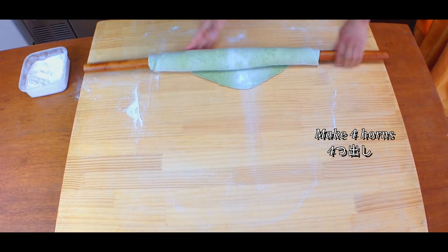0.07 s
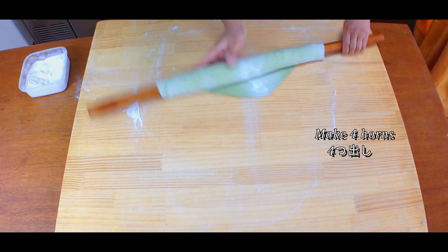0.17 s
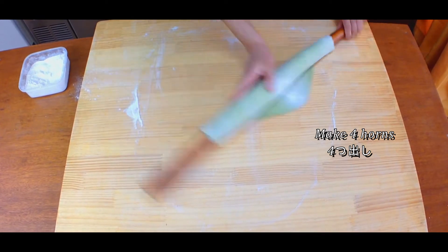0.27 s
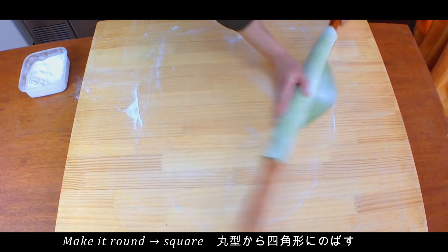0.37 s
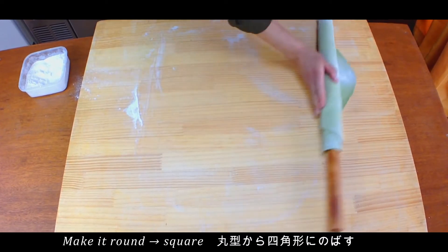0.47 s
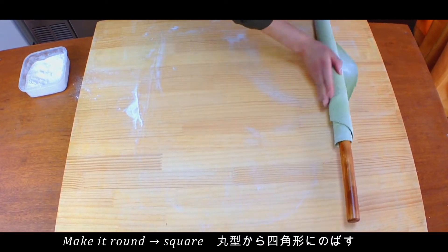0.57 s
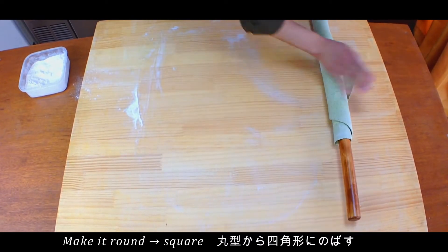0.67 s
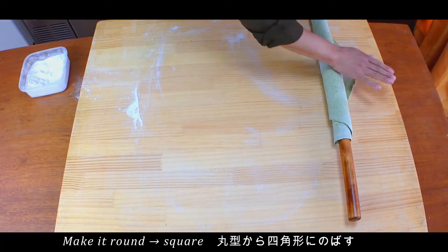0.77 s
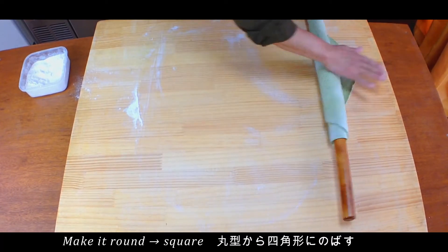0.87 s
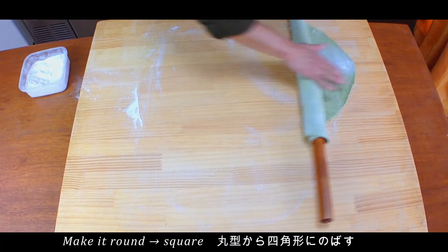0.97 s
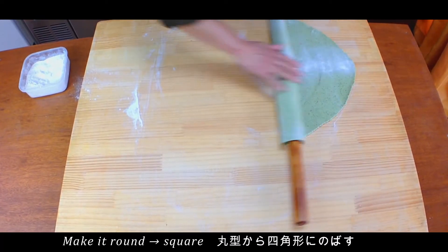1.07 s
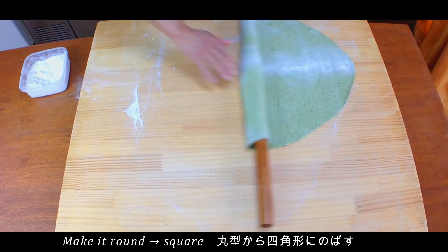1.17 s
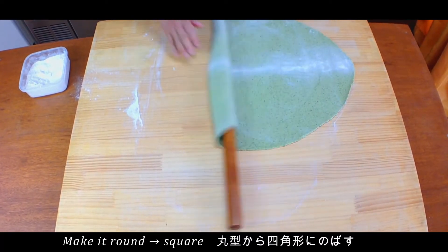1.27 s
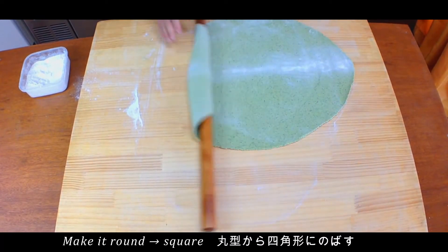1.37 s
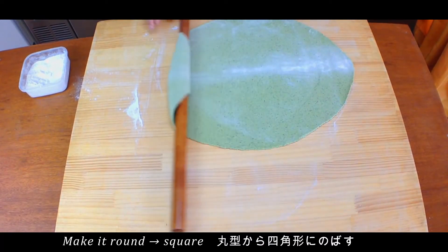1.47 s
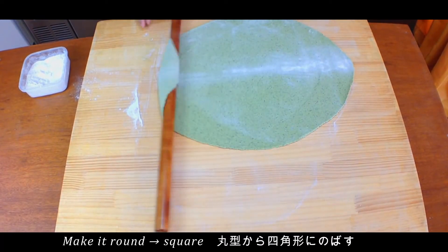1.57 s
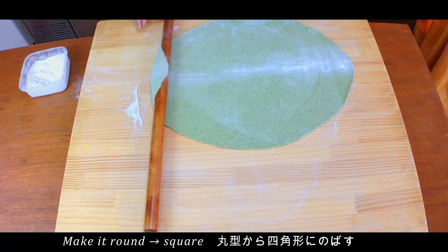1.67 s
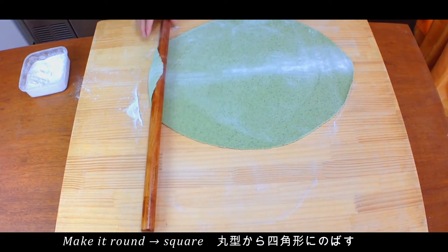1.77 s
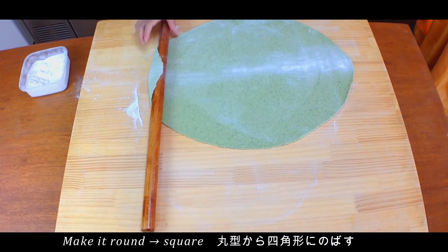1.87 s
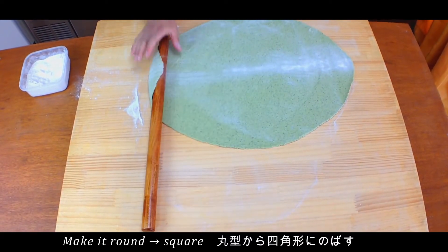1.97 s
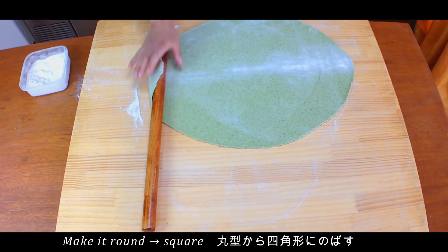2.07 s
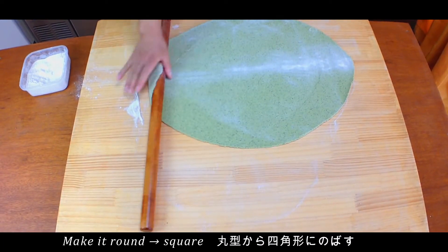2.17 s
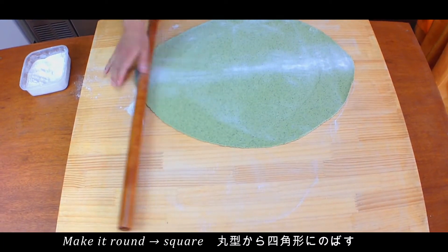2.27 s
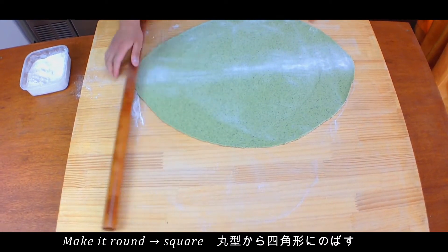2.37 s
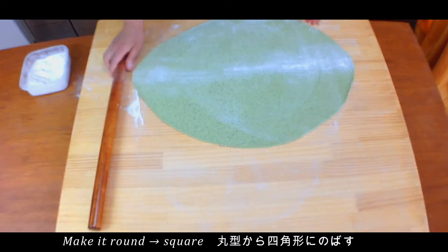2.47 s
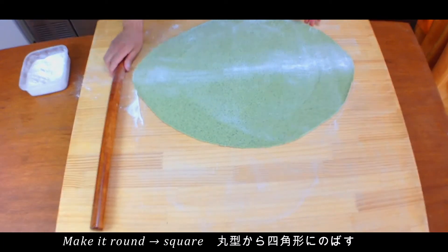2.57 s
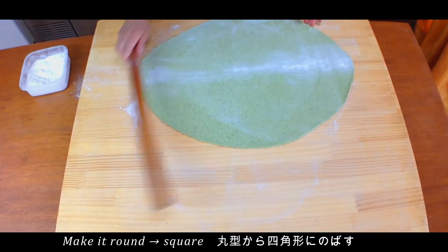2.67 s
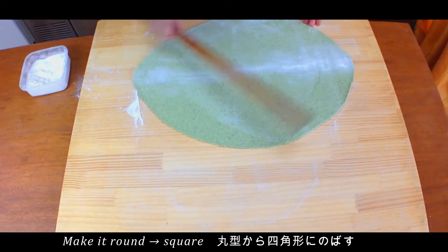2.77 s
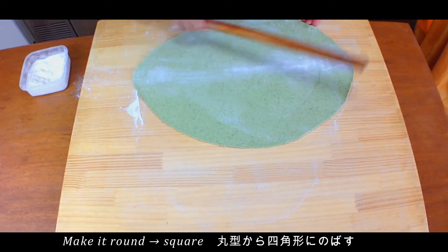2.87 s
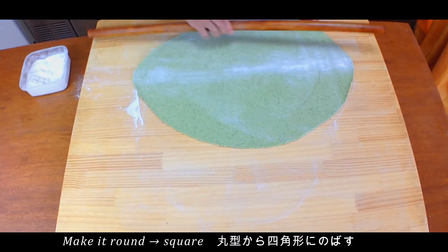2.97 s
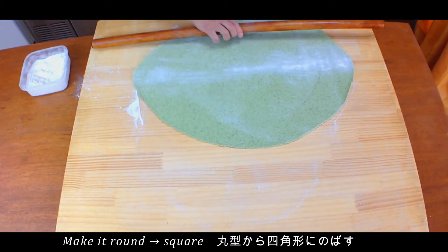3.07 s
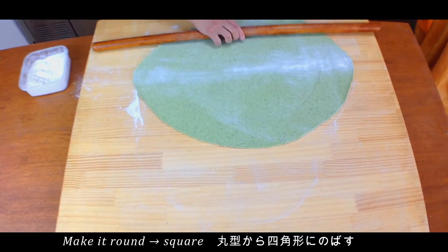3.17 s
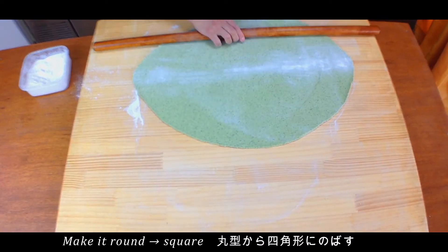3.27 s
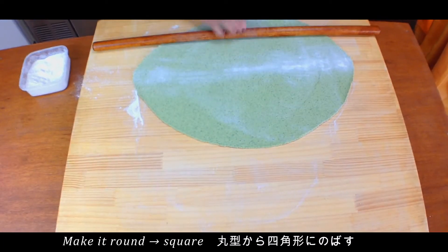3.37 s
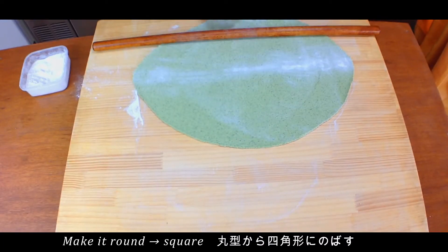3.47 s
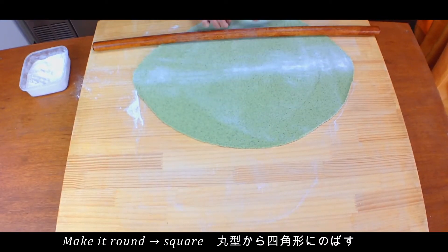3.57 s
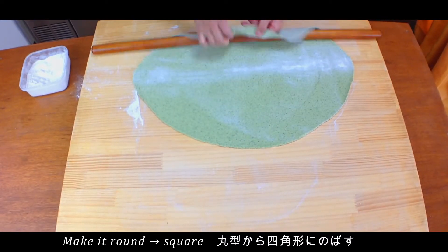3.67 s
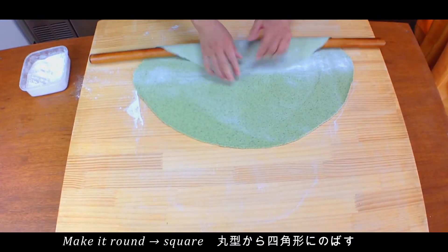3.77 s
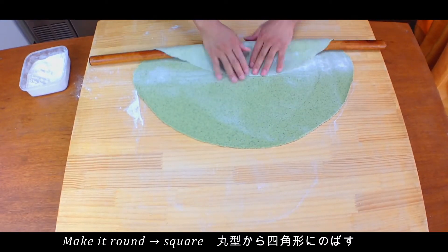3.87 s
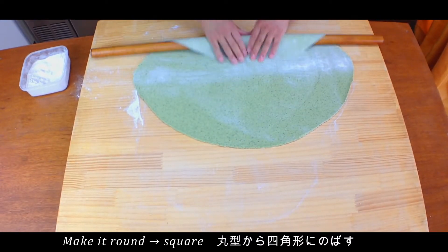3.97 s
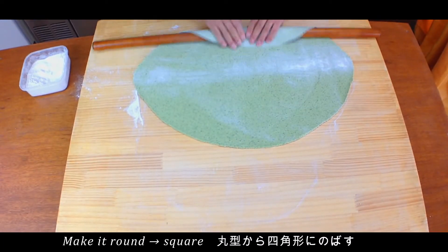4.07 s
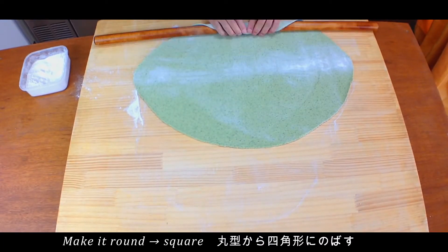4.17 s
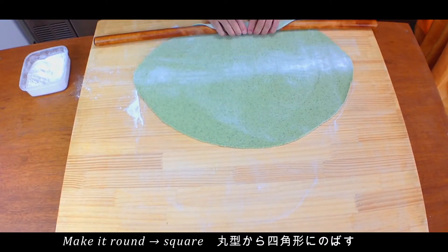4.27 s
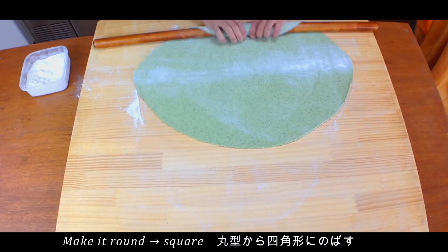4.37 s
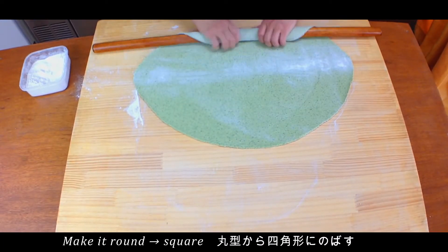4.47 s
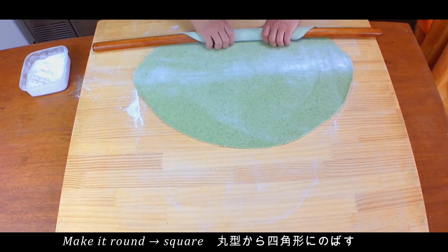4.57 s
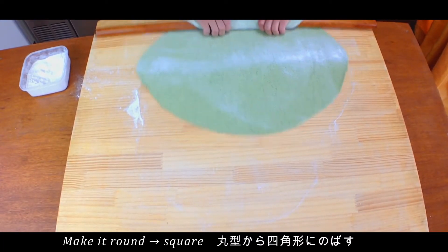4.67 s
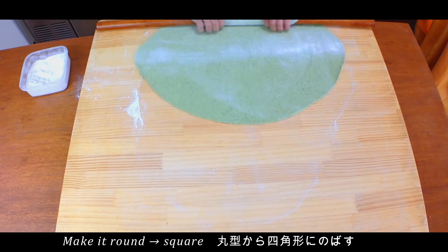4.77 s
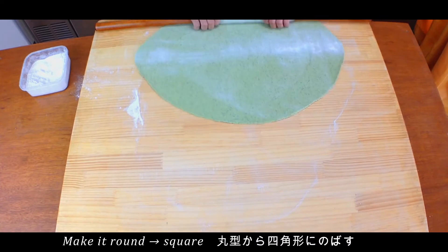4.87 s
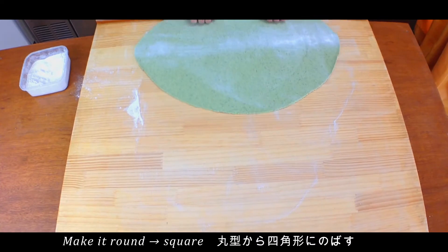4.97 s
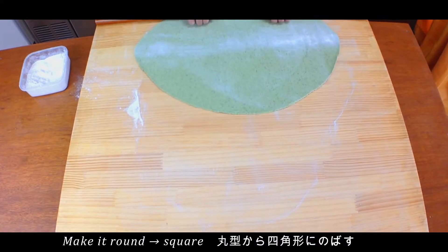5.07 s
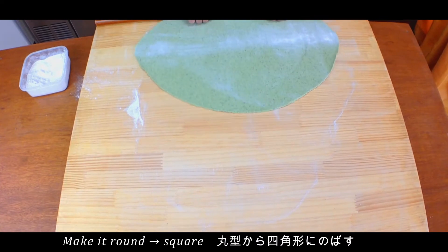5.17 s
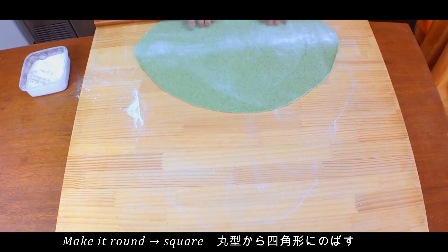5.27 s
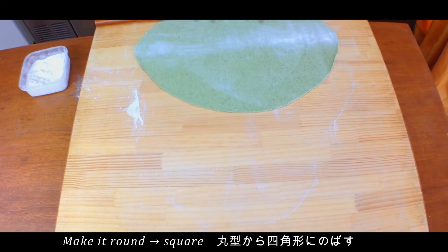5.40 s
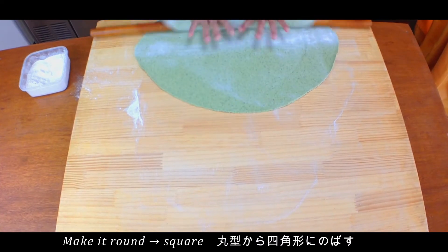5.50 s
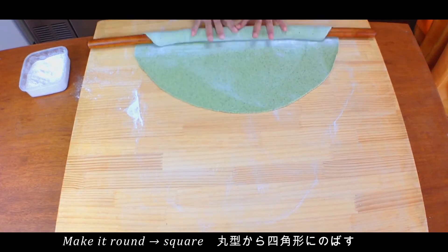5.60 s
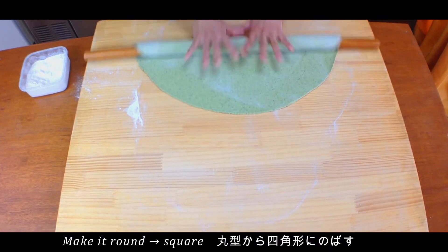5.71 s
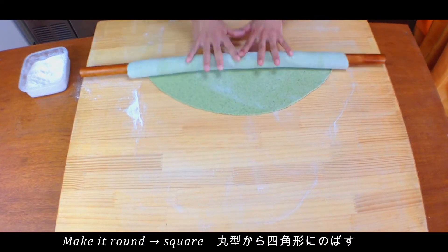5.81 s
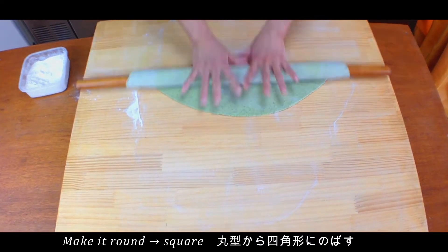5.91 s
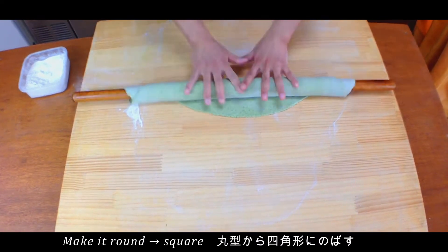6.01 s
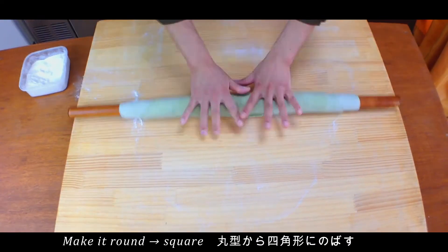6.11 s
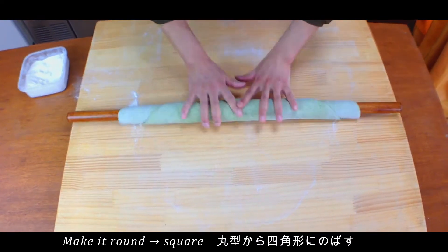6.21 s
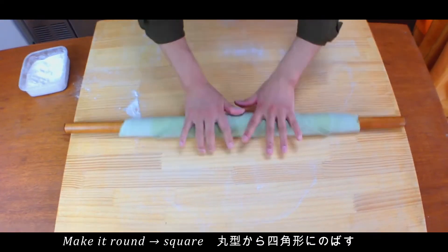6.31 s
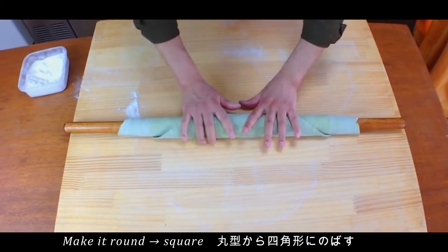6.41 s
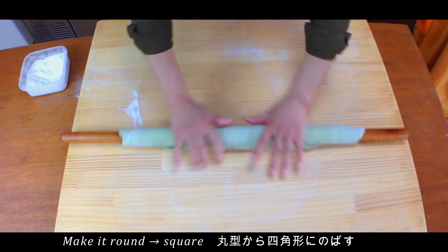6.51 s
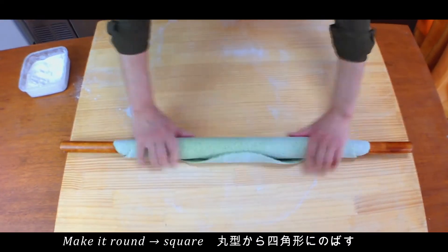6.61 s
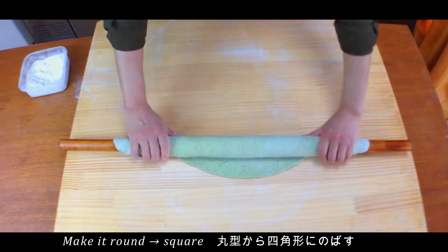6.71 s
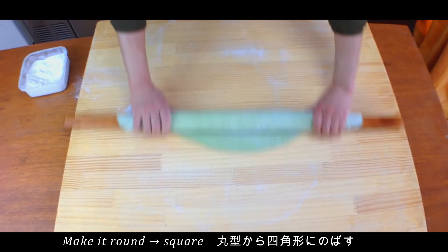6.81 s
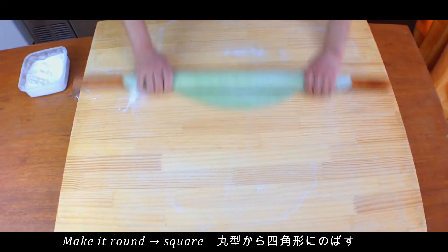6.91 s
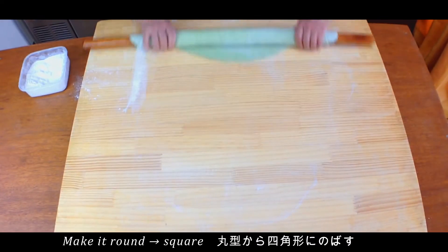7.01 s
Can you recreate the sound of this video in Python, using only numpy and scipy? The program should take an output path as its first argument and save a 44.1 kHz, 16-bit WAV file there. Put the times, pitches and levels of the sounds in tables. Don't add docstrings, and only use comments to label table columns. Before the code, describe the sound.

A small kitchen with short room echo, faint steady hiss and low table rumble, heard close. From 0.2 to 0.7 seconds a floured dough roll drags and turns over a wooden board with a dry hiss and soft rubbing pitch. Until 2.5 it is quiet: light brushing, gentle rumbling, a faint flick at 2.3. Around 2.53 to 2.58 the wooden pin lands in a loud, clattering double knock with hollow board ring. A second, sharper double knock comes near 3.25, followed by a low thump at 3.36. A duller padded knock falls at 3.94. Dough rubs softly from 4 to 4.3, then slides and presses from 4.6 to 5.3. From 5.5 to 6.5 come quick pushes about every 0.18 seconds, each a bright floury finger brush with a soft low thud and stand rumble. Small thuds lead to a strong sweeping hiss from 6.9 to the end, about 7.

```python
import sys
import numpy as np
from scipy import signal
from scipy.fft import rfft, irfft, next_fast_len
from scipy.io import wavfile
from scipy.ndimage import uniform_filter1d, map_coordinates

SR = 44100
rng = np.random.default_rng(int(sys.argv[2]) if len(sys.argv) > 2 else 0)


def to_wav(s):
    ch = np.atleast_2d(s).T
    pcm = np.round(np.clip(ch, -1, 1) * 32767)
    wavfile.write(sys.argv[1], SR, pcm.astype(np.int16))


def volts_from_decibels(level):
    exponent = np.asarray(level, float) / 20
    return 10 ** exponent


N = 310905

# start in seconds, clack level in dB, clack pitch in Hz,
# time for the clack to fall 60 dB in seconds, ring level in dB.
KNOCKS_LEFT = [(2.51, -47.5, 1500, 0.053, -69), (2.5175, -38.5, 1530, 0.036, -65),
               (2.5228, -25, 1580, 0.027, -63), (2.5274, -6, 1490, 0.008, -25),
               (2.5312, -11, 1163, 0.047, -49), (2.5430, -11.5, 1250, 0.012, -34.5),
               (2.5490, -14, 1545, 0.024, -30), (2.5561, -3, 1170, 0.026, -16.5),
               (2.5565, -9.5, 2435, 0.0095, -60.5), (2.5845, -10, 900, 0.012, -28.5),
               (2.668, -29.5, 972, 0.11, -61)]
KNOCKS_FAR = [
    (3.2390, -28, 1290, 0.016, -72),
    (3.2480, -21, 1250, 0.032, -36),
    (3.2545, -12.5, 900, 0.011, -18),
    (3.2612, -19, 978, 0.083, -36),
    (3.2652, -7, 1170, 0.008, -11),
    (3.2872, -25, 1816, 0.036, -7),
]
KNOCKS_WRAPPED = [
    (3.7620, -42.5, 1740, 0.05, -56),
    (3.9230, -21.5, 1380, 0.0076, -26),
    (3.9398, -9, 676, 0.012, -15),
    (3.9550, -25, 560, 0.077, -19),
    (5.0050, -42, 564, 0.036, -26),
]
# pitch in Hz, level in dB, time to
# fall 60 dB in seconds.
LEFT_EDGE = [(132.3, -9.5, 0.22), (205, -1.5, 0.13), (175, -8.5, .22), (248, -2, .066), (309.3, -3.5, 0.2),
             (353, -3, 0.073), (445, -11, 0.35), (544, -7.5, 0.17), (586, -1.5, 0.24),
             (824, -13, 0.17), (870, -9.5, .08), (972, -7, 0.22), (1200, -8, 0.045), (980, -13, 0.16),
            (1237, -4.5, .05), (1324, -15.5, .08), (1342, -7, .06), (1360, -13.5, 0.13), (1480, -7.5, .07),
            (1597, -7, 0.1), (1820, -2.5, 0.085), (2500, -16, .1), (2860, -31, .08)]
FAR_EDGE = [(120, -20.5, 0.143), (281.5, -3.5, 0.047), (309.5, -3.5, 0.093), (546, -8.5, 0.12),
            (613, -10, 0.091), (874, -7.5, .14), (962, -14.5, 0.068), (1220, -23, 0.18), (1430, -32, 0.073),
            (1500, 1.5, 0.017), (1860, -31, .2), (2230, -41, .15), (2466, -32, .09), (2570, -46, .2)]
WRAPPED = [(254, -20, 0.09), (438, -33, 0.095), (560, -8, 0.071), (612, -12, 0.066), (666, -15, 0.062),
           (860, -37, 0.091), (910, 2, 0.011), (1130, -14, .07), (1232, -17.5, 0.16), (1370, -28, 0.079)]
# frequency in Hz, level in dB per Hz.
CLATTER = [(150, -27.5), (400, 4), (1200, 4), (2500, -6), (3500, -18.5), (5500, -33), (9000, -45),
           (15000, -50)]
TICK = [(1500, -3), (3500, 8.5), (6000, 11), (9000, -10), (15000, -19)]
CLATTER_S = 0.0028
SHARP_S, SHARP_POWER = 0.016, 0.77
WANDER = 0.35
# start in seconds, level in dB, pitch in Hz, silent after this many seconds.
BOOMS = [
    (2.5551, -13.5, 156.5, 0.057),
    (2.5561, -24, 120, 0.056),
    (3.264, -31.5, 124.6, 0.055),
]
DAMP_POWER = 2.7

# start in
# seconds, speed-up in seconds, slow-down in seconds, flour hiss in dB, weight on the dough in dB.
MOVES = [(.175, 0.013, 0.091, -48, -7), (.19, 0.34, 0.21, -36.5, -2.5), (.508, 0.006, 0.047, -41.5, 6.5),
         (.56, 0.018, 0.037, -54, 7.5), (1.04, 0.4, 0.45, -61, -1), (3.27, 0.15, 0.11, -52.5, 3.5),
         (3.42, 0.089, 0.095, -62, 9.5), (4.0, 0.15, 0.076, -54, 2.5), (4.14, 0.13, 0.069, -54, 1.5),
         (4.27, 0.029, 0.16, -60, -8), (4.47, 0.093, 0.067, -58.5, -0.5), (4.58, 0.072, 0.24, -55.5, 2),
         (4.733, 0.011, 0.085, -47, -5), (4.75, 0.093, 0.069, -41, 3.5), (4.84, 0.063, 0.15, -54, 3.5),
         (4.99, 0.069, 0.12, -43, -2), (5.23, 0.038, 0.076, -50.5, -11.5), (6.645, 0.12, 0.2, -46, -3.5),
         (6.83, 0.037, 0.05, -65.5, 17), (6.888, 0.013, .1, -42, -3.5), (6.9, 0.16, .3, -30.5, -4),
         (0, 0.0026, 0.19, -58.5, -2), (.66, 0.054, .14, -50.5, -1), (.8, 0.14, 0.13, -70.5, 5.5),
           (1.05, .02, 0.23, -61, -9), (1.78, 0.033, 0.26, -78.5, 9), (2.28, 0.023, 0.33, -64.5, -2),
           (2.45, 0.14, 0.11, -57.5, -5), (2.62, 0.064, 0.11, -63, -8.5), (2.95, 0.1, 0.043, -61, -3.5),
           (3.08, 0.036, 0.032, -63.5, -11), (3.17, 0.084, 0.088, -61.5, 3), (3.64, 0.067, 0.03, -73, 6),
           (3.754, 0.022, 0.11, -58, 2.5), (3.85, 0.094, 0.14, -59.5, 2.5), (5.14, .04, 0.34, -63.5, 4)]
# start in seconds, coasting time in seconds, flour hiss in dB, weight in dB.
PUSHES = [
    (5.51, 0.57, -62.5, 0.5),
    (5.66, .07, -70, 9),
    (5.72, 0.3, -58, -1.5),
    (5.924, 0.32, -57.5, -0.5),
    (6.109, 0.29, -57, -3),
    (6.288, 0.26, -57, -6),
    (6.469, 0.36, -59, -10),
]
PUSH_S, REST_DB = 0.0084, -76
START_POWER, STOP_POWER = 0.86, 1.51
# start, speed-up and slow-down in seconds, level in dB.
ROLLS = [(.25, 0.29, 0.38, -48.5), (1.2, 0.3, 0.23, -63), (3.3, 0.083, 0.28, -52),
         (3.755, 0.012, 0.041, -55), (3.97, 0.044, 0.22, -63), (4.74, 0.1, 0.15, -49.5),
         (5.06, 0.05, 0.096, -48.5), (5.2, 0.084, 0.047, -58), (5.655, 0.013, 0.18, -56.5),
         (6.11, 0.01, 0.42, -60), (6.29, 0.014, 0.075, -56), (6.45, 0.037, 0.29, -60.5),
         (6.8, 0.11, 0.04, -52)]
# frequency in Hz, level in dB per Hz.
FLOUR = [(1500, -11), (3000, 0), (4500, 0), (7000, 0.5), (9500, -4.5), (12000, -5.5), (15500, -9)]
SCRAPE = [(500, -38), (950, -6), (1400, -2), (1900, -0.5), (2600, -3.5), (3800, -11.5), (7000, -19),
          (15000, -35)]
SKID = [(350, -40), (600, -12.5), (800, -4), (1050, -6.5), (1400, -5.5), (2500, -31), (6000, -82)]
DRONE = [(200, -46), (400, -5), (600, -2.5), (950, -5), (1300, -8), (2500, -29), (6000, -78)]
MURMUR = [(60, -38), (110, 0), (300, -5.5), (450, -15), (1000, -50.5), (3000, -99)]
MIDDLING_DB = -55
DRONE_DB, DRONE_GROWS = -61.5, 0.72
MURMUR_DB, MURMUR_GROWS, MURMUR_S = -62, 0.15, 0.27
MURMUR_LUMPS_DB = 3
# start in seconds, length in seconds, level in dB, first pitch in Hz, last pitch in Hz.
RUBS = [(0, 0.15, -64, 599, 920), (.25, 0.19, -50, 950, 1037), (0.424, 0.16, -45, 1553, 1580),
        (0.533, .1, -43, 1720, 2050), (0.598, 0.088, -46, 1074, 1190), (3.496, 0.068, -56.5, 900, 944),
        (4.026, .16, -57, 612, 735), (4.122, 0.15, -57, 803, 1133), (4.15, 0.12, -58, 1500, 1900),
        (4.14, 0.15, -63, 2320, 2700), (3.76, 0.022, -53, 1810, 1800), (4.61, 0.067, -54, 1900, 1690),
        (4.652, 0.055, -60, 1400, 1390), (5.076, .07, -54.5, 1098, 1226), (5.655, 0.046, -56.5, 710, 680),
        (6.17, 0.041, -52.5, 1013, 900), (6.12, 0.017, -50, 630, 630), (5.665, .05, -59, 1190, 1220),
        (5.717, .12, -57.5, 1150, 1048), (6.669, 0.17, -51.5, 894, 1070), (6.78, 0.091, -58, 1500, 1596)]
RUB_WIDTH_HZ = 210

# start in seconds, peak in dB, middle band in dB,
# rise in seconds, gone after this many seconds.
FLICKS = [(2.2922, -55, -15, 0.0028, 0.078), (3.2176, -63, 24.5, 0.0083, 0.19),
          (3.7656, -45, -6, .008, 0.12), (4.1012, -38.5, -17, 0.0076, .1), (5.247, -44, -11, 0.005, 0.091),
          (5.729, -35, -8.5, 0.0029, 0.061), (5.930, -39.5, -14, .002, 0.1),
          (6.112, -36.5, -20, 0.0048, .1), (6.293, -35.5, -9, 0.0069, .11), (6.45, -46, -8, .006, 0.079),
          (6.488, -40.5, -6, .004, 0.073)]
LIFT_POWER = 1.8
# start in seconds, level in dB, board pitch in
# Hz, rise in seconds.
PRESSES = [(0.184, -30, 150, 0.015), (2.525, -35, 111, .002), (2.639, -31, 77, 0.0068),
           (3.359, -16.5, 105, 0.038), (3.442, -26.5, 110, 0.024), (3.771, -42.5, 110, 0.0083),
           (3.968, -30.5, 270, 0.0083), (4.017, -34, 150, 0.01), (4.563, -37.5, 450, 0.012),
           (4.576, -38.5, 200, 0.005), (4.582, -41, 313, .006), (4.628, -45, 285, 0.0071),
           (4.741, -43, 330, 0.0072), (4.802, -27.5, 304, 0.02), (4.874, -36.5, 219, 0.0037),
           (5, -27, 163.6, 0.0066), (5.006, -31.5, 329, 0.0042), (5.097, -37.5, 159, 0.0074),
           (5.525, -31.5, 174, 0.016), (5.595, -56, 111, 0.012), (5.655, -44, 267, 0.0075),
           (5.665, -32, 162, 0.015), (5.735, -34, 150, 0.0095), (5.769, -41.5, 150, 0.0084),
           (5.949, -39.5, 150, 0.0057), (6.135, -34, 150, 0.0097), (6.16, -21.5, 270, 0.015),
           (6.188, -31.5, 150, 0.003), (6.324, -32, 135, 0.0076), (6.376, -25, 210, 0.01),
           (6.406, -32, 312, 0.012), (6.565, -33.5, 227, 0.0032), (6.58, -37.5, 327, 0.0035),
           (6.604, -35.5, 193, 0.0068), (6.681, -41.5, 320, 0.0076), (6.72, -32, 173, 0.014),
           (6.762, -31.5, 120, 0.0035), (6.835, -29, 235.5, 0.0058), (6.852, -34.5, 478, 0.004),
           (6.881, -31.5, 131, 0.006)]
PRESS_T60, PRESS_HZ, PRESS_POWER = 0.16, 150, 0.53
# start in seconds, level in dB.
JOLTS = [(.218, -32), (1.701, -29.5), (2.556, -44), (3.36, -42), (4.028, -37), (4.584, -31), (4.875, -32),
         (5.001, -34), (5.529, -28), (5.669, -31), (5.77, -37), (5.951, -23.5), (6.134, -21), (6.325, -42),
         (6.408, -18), (6.581, -18), (6.761, -39), (6.835, -22.5), (6.885, -31)]
STAND_HZ, STAND_T60 = 59, 0.046

# middle in seconds, half length in seconds, rumble in dB.
LEANS = [(0.236, 0.065, -41), (0.465, 0.22, -45.5), (1.14, 0.16, -40), (1.41, 0.21, -43.5),
         (1.74, 0.085, -40.5), (1.995, 0.044, -47), (2.54, 0.18, -41.5), (2.662, 0.1, -38),
         (2.9, 0.17, -46.5), (3.355, 0.19, -36), (3.557, 0.075, -39.5), (3.948, 0.03, -32),
         (4.078, 0.17, -40.5), (4.226, 0.15, -44), (4.61, 0.099, -42.5), (5.027, 0.1, -40),
         (5.294, 0.044, -49), (5.581, 0.075, -31), (5.757, 0.074, -38), (5.834, 0.12, -39),
         (5.975, 0.085, -35.5), (6.147, 0.16, -33), (6.404, 0.2, -35.5), (6.59, 0.25, -39),
         (6.773, 0.048, -45), (6.89, 0.14, -36)]
TABLE_DB = -49
# frequency in Hz, level in dB per Hz.
RUMBLE = [(8, -31), (15, 4.5), (30, -11), (60, -7), (85, -21), (130, -26), (250, -54), (440, -120)]
HISS = [(59, -21), (100, -33.5), (530, -17), (1490, -25), (3460, -27.5), (5870, -27.5), (13900, -28.5),
        (15500, -30)]
HISS_DB, TOP_HZ = -60.5, 15410
# frequency in Hz, time to fall 60 dB in seconds.
KITCHEN = [(100, 0.36), (1000, 0.41), (3000, 0.41), (6000, 0.47), (12000, 0.23)]


def unit(x):
    return x / np.sqrt(np.mean(x ** 2) + 1e-20)


def along(points, hz):
    f, v = np.transpose(points)
    return np.interp(np.log(hz + 1), np.log(f + 1), v)


def colour(x, spectrum):
    size = next_fast_len(len(x) + 8192)
    gain = volts_from_decibels(along(spectrum, np.fft.rfftfreq(size, 1 / SR)))
    return unit(irfft(rfft(x, size) * gain, size)[:len(x)])


def noise(spectrum, length=N):
    return colour(rng.standard_normal(length), spectrum)


def wobble(rate):
    return map_coordinates(rng.standard_normal(N // 100), [np.arange(N) * rate / SR])


def swell(t, rise, t60):
    return (1 - np.exp(-t / rise)) ** 2 * volts_from_decibels(-60 * t / t60)


def held(t, rise, gone, power):
    return (1 - np.exp(-t / rise)) ** 2 * volts_from_decibels(-60 * (t / gone) ** power)


def add(track, s, sound):
    part = track[round(s * SR):][:len(sound)]
    part += sound[:len(part)]


def strokes(rows, rest_db):
    power = np.full(N, volts_from_decibels(2 * rest_db))
    for s, up, down, db in rows:
        t = np.arange(round((up + down) * SR)) / SR
        phase = np.interp(t, [0, up, up + down], [0, np.pi / 2, np.pi])
        bend = np.where(phase < np.pi / 2, START_POWER, STOP_POWER)
        add(power, s, volts_from_decibels(2 * db) * np.abs(np.sin(phase)) ** (2 * bend))
    return 10 * np.log10(power)


def knock(contacts, modes, hard_hz, clatter_db, clatter_t60, tick_db, room_db):
    out, t = np.zeros(N), np.arange(SR // 2) / SR
    for s, clack_db, clack_hz, clack_t60, ring_db in contacts:
        cut_hz = hard_hz * (SHARP_S / clack_t60) ** SHARP_POWER
        uneven_db = rng.normal(0, 1, len(modes))
        steps = rng.standard_normal((len(modes), len(t))) * np.sqrt(20 / SR)
        waver = WANDER * uniform_filter1d(np.cumsum(steps, axis=1), size=200, axis=1)
        ring = np.zeros(len(t))
        for k, (hz, db, t60) in enumerate(modes):
            fade = volts_from_decibels(db + uneven_db[k] - 60 * t / t60) / (1 + (hz / cut_hz) ** 2)
            ring += (-1) ** k * fade * np.sin(2 * np.pi * hz * t + waver[k])
        clack = volts_from_decibels(-60 * t / clack_t60) * np.sin(2 * np.pi * clack_hz * t)
        clatter = volts_from_decibels(clatter_db - 60 * t / clatter_t60) * noise(CLATTER, len(t))
        clatter *= 1 - np.exp(-t / CLATTER_S)
        tick = (cut_hz / hard_hz) ** 0.77 * volts_from_decibels(tick_db - 60 * t / 0.0057) * noise(TICK, len(t))
        touch = np.sin(np.pi / 2 * np.minimum(t * cut_hz / 1.7, 1)) ** 2
        add(out, s, touch * (volts_from_decibels(clack_db) * (clatter + tick - clack) - volts_from_decibels(ring_db) * ring))
    return out + volts_from_decibels(room_db) * kitchen(out)


def booms():
    out, t = np.zeros(N), np.arange(SR // 4) / SR
    for s, db, hz, gone in BOOMS:
        add(out, s, volts_from_decibels(db) * held(t, 0.00096, gone, DAMP_POWER) * np.sin(2 * np.pi * hz * t))
    return out + volts_from_decibels(-11) * kitchen(out)


def grit(share, spread_db):
    grains = (rng.random(N) < share) * volts_from_decibels(spread_db * rng.random(N))
    return rng.standard_normal(N) * (1 + grains)


def patchy(x, depth_db):
    z = signal.stft(x, nperseg=512)[2]
    field = uniform_filter1d(rng.standard_normal(z.shape), size=5, axis=0)
    field = uniform_filter1d(field, size=6, axis=1)
    return signal.istft(z * volts_from_decibels(depth_db * unit(field)), nperseg=512)[1][:N]


def slide():
    pushes = [(s, PUSH_S, coast, db, weight_db) for s, coast, db, weight_db in PUSHES]
    moves = MOVES + pushes
    hiss_db = strokes([(s, up, down, db) for s, up, down, db, _ in moves], REST_DB)
    scrape_db = strokes([(s, up, down, db + weight_db) for s, up, down, db, weight_db in moves], REST_DB)
    drone_db = DRONE_DB + DRONE_GROWS * (hiss_db - MIDDLING_DB)
    slow_db = uniform_filter1d(scrape_db, round(MURMUR_S * SR))
    murmur_db = MURMUR_DB + MURMUR_GROWS * (slow_db - MIDDLING_DB)

    slip = wobble(35)
    skid = volts_from_decibels(drone_db) * noise(SKID)
    roll = volts_from_decibels(strokes(ROLLS, REST_DB)) * noise(DRONE)
    board = volts_from_decibels(0.36 * slip + 0.46 * wobble(7)) * (skid + roll)
    flour = colour(grit(share=0.073, spread_db=-6.0), FLOUR)
    hiss = volts_from_decibels(hiss_db + 1.0 * slip + 0.66 * wobble(55)) * flour
    dough = colour(patchy(grit(share=0.02, spread_db=12.0), depth_db=1.5), SCRAPE)
    scrape = volts_from_decibels(scrape_db + 0.21 * slip + 0.5 * wobble(150)) * dough
    murmur = volts_from_decibels(murmur_db + MURMUR_LUMPS_DB * wobble(24)) * noise(MURMUR)
    return hiss + scrape + board + murmur


def rubs():
    out, t = np.zeros(N), np.arange(SR // 4) / SR
    narrow = [(1, 0), (RUB_WIDTH_HZ / 2, -3), (RUB_WIDTH_HZ * 2, -30), (8000, -90)]  # (Hz, dB per Hz)
    for s, length, db, first_hz, last_hz in RUBS:
        done = np.minimum(t / length, 1)
        turn = 2 * np.pi * np.cumsum(first_hz + (last_hz - first_hz) * done) / SR
        glide = noise(narrow, len(t)) * np.sin(turn) + noise(narrow, len(t)) * np.cos(turn)
        add(out, s, volts_from_decibels(db) * np.sin(np.pi * done) ** 0.63 * glide)
    return out


def flicks():
    bright, mid, t = np.zeros(N), np.zeros(N), np.arange(SR // 4) / SR
    for s, db, mid_db, rise, gone in FLICKS:
        add(bright, s, volts_from_decibels(db - 8.0) * held(t, rise, gone, LIFT_POWER))
        add(mid, s, volts_from_decibels(db + mid_db - 8.5) * held(t, rise, 1.2 * gone, LIFT_POWER))
    skin = [(2500, -31.0), (4500, -3), (6000, -2.5), (9000, -4.0), (12000, -4.5), (15500, -12.0)]  # (Hz, dB per Hz)
    return bright * noise(skin) + mid * noise(SCRAPE)


def presses():
    out, t = np.zeros(N), np.arange(SR // 3) / SR
    unsteady = [(5, 0), (40, 0), (90, -40), (2000, -70), (6000, -120)]  # (Hz, dB per Hz)
    for s, db, hz, rise in PRESSES:
        drift = 0.4 * noise(unsteady, len(t))
        air = [(hz / 3, -20), (hz, 0), (hz * 1.4, -5), (hz * 7.5, -25), (hz * 15, -70), (hz * 30, -140)]
        puff = volts_from_decibels(-8) * noise(air, len(t))
        t60 = PRESS_T60 * (PRESS_HZ / hz) ** PRESS_POWER
        add(out, s, volts_from_decibels(db) * swell(t, rise, t60) * (np.sin(2 * np.pi * hz * t + drift) + puff))
    for s, db in JOLTS:
        add(out, s, volts_from_decibels(db) * swell(t, 0.002, STAND_T60) * np.sin(2 * np.pi * STAND_HZ * t))
    return out


def table():
    shake_db = strokes([(s - half, half, half, db) for s, half, db in LEANS], TABLE_DB)
    return volts_from_decibels(shake_db + 1.3 * wobble(19)) * noise(RUMBLE)


def kitchen(x):
    hz, t, z = signal.stft(rng.standard_normal(SR * 3 // 4), SR, nperseg=256)
    z = z / np.abs(z) ** 0.6
    fade = volts_from_decibels(-60 * t / along(KITCHEN, hz)[:, None])
    tail = signal.istft(z * fade, SR, nperseg=256)[1]
    late = np.pad(x, (150, 0))
    return signal.fftconvolve(late, tail / np.linalg.norm(tail))[:N]


def scene():
    pin = knock(KNOCKS_LEFT, LEFT_EDGE, hard_hz=2466, clatter_db=-6.0, clatter_t60=0.074,
                tick_db=-39, room_db=-7.5)
    pin += knock(KNOCKS_FAR, FAR_EDGE, hard_hz=1250, clatter_db=-11.5, clatter_t60=0.071,
                 tick_db=-24, room_db=-8)
    pin += knock(KNOCKS_WRAPPED, WRAPPED, hard_hz=1640, clatter_db=-23, clatter_t60=0.13,
                 tick_db=-20, room_db=-8.5)
    pin += booms()
    hands = slide() + rubs() + flicks() + presses()
    return (pin + hands + volts_from_decibels(-10.5) * kitchen(hands) + table())[None]


def top_cut(x):
    return signal.sosfilt(signal.butter(12, 15640, fs=SR, output="sos"), x)


def record(dry):
    wet = rfft(dry + volts_from_decibels(HISS_DB) * noise(HISS))
    passed = np.fft.rfftfreq(N, 1 / SR) < TOP_HZ
    return top_cut(irfft(wet * passed, N))


dry = scene()
out = record(dry)
to_wav(out)
```